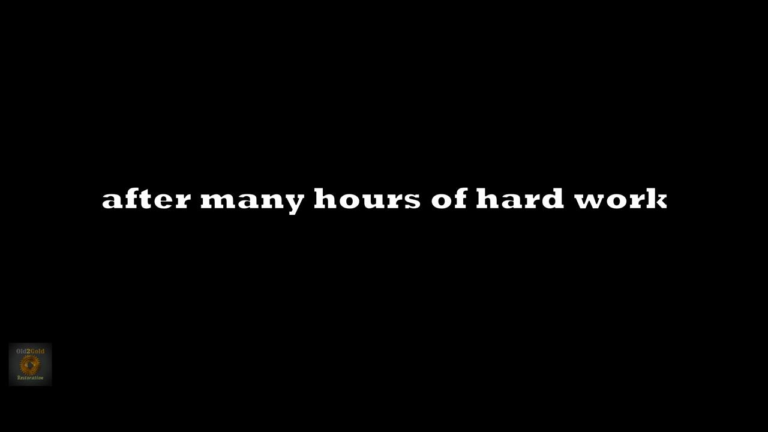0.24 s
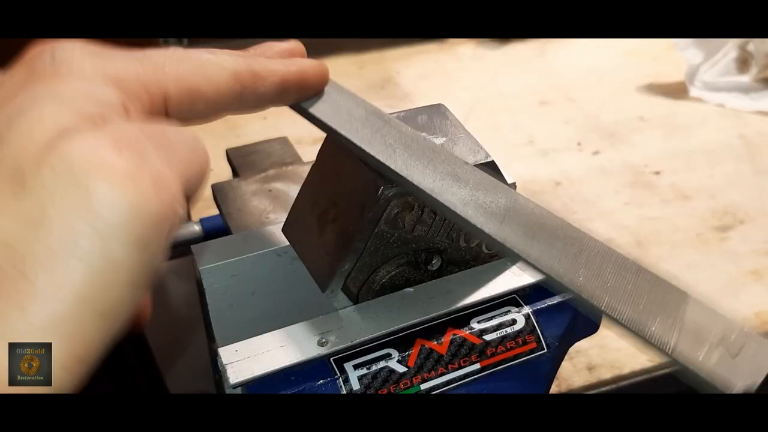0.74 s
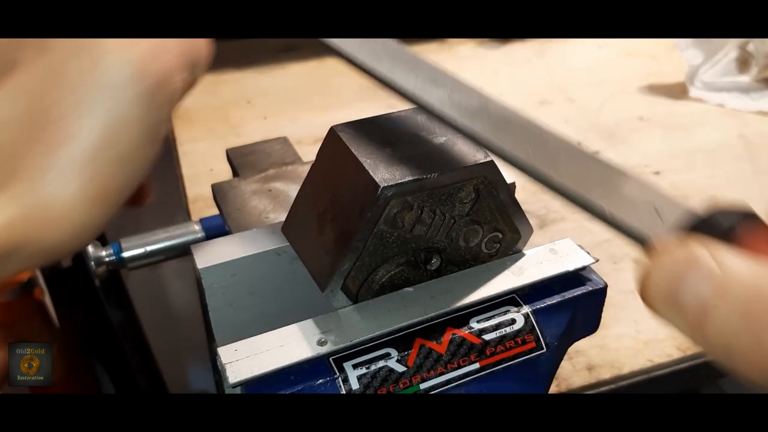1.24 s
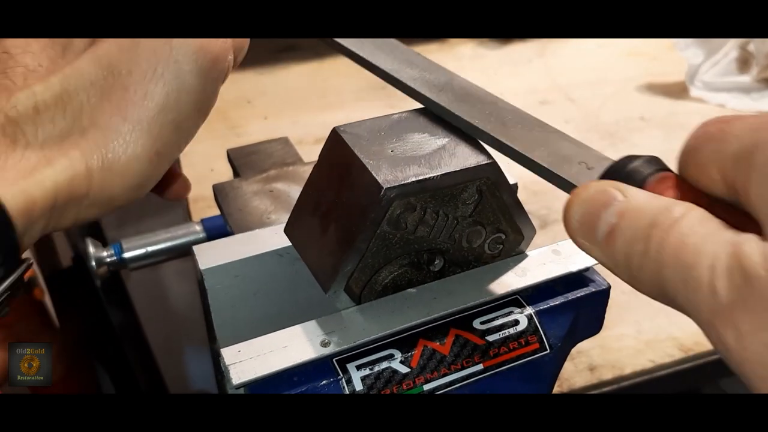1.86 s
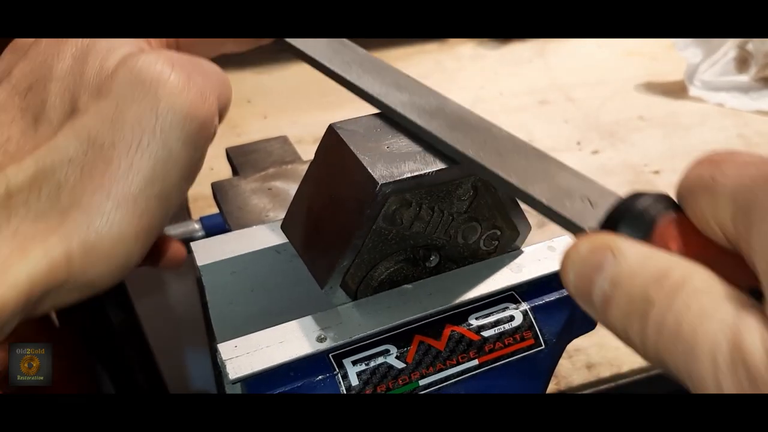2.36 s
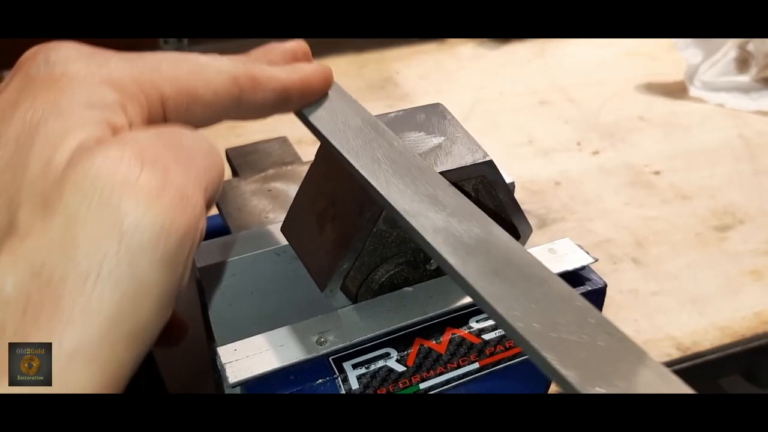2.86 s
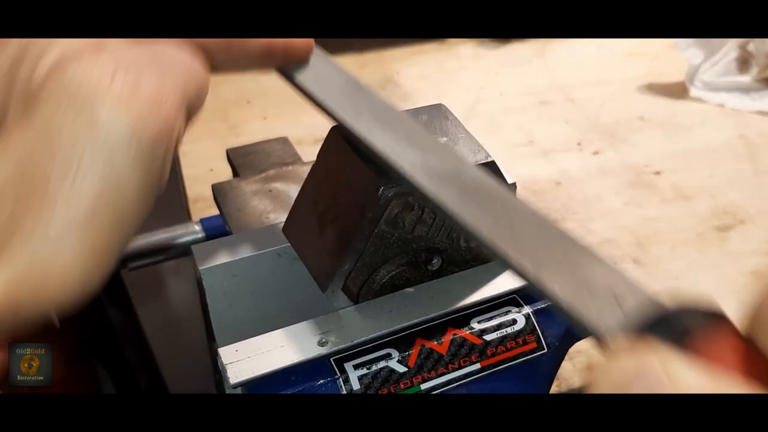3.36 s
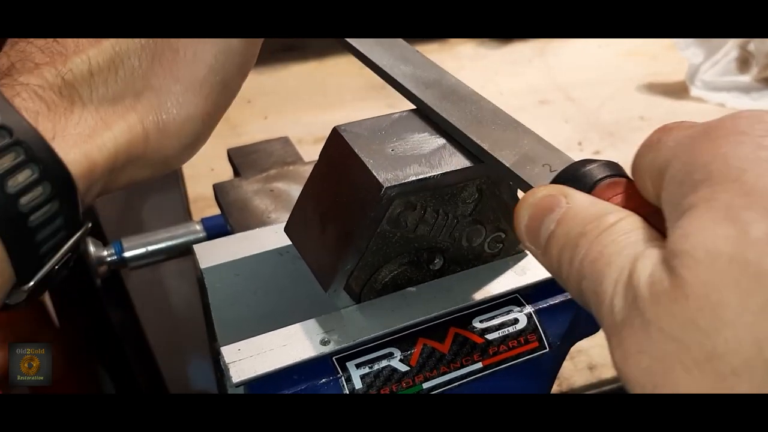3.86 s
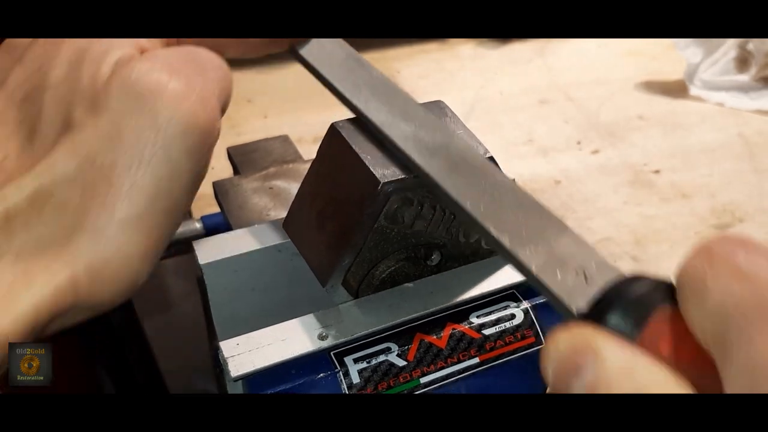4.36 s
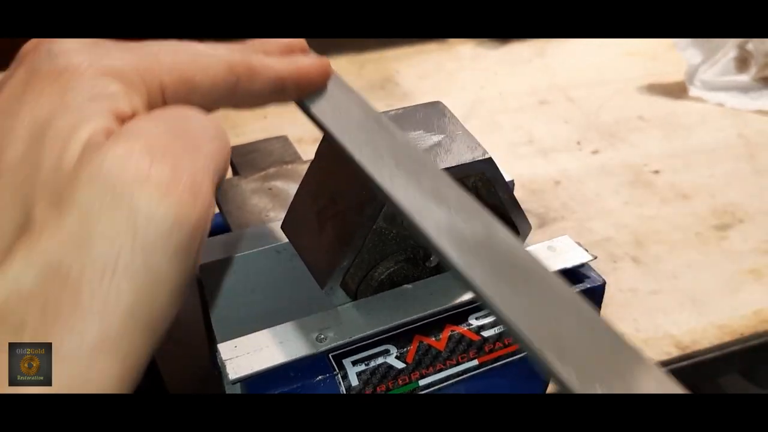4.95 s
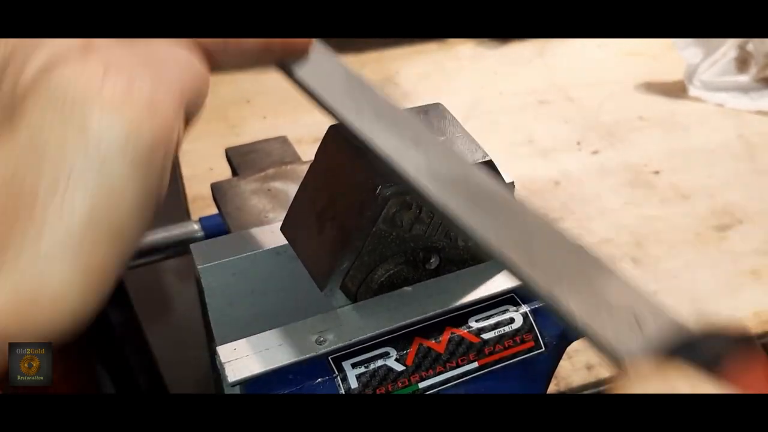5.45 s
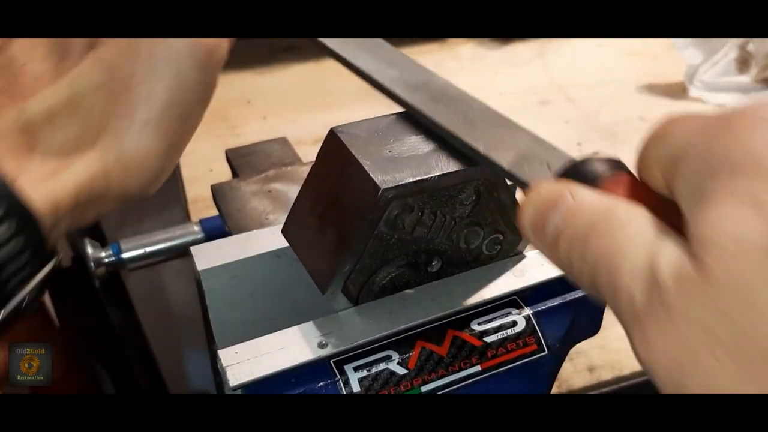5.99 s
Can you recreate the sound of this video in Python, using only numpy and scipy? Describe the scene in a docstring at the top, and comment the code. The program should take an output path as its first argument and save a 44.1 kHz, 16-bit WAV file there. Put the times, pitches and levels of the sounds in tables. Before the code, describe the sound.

A hand file clacks onto a clamped iron block and rasps across it in nine short, gritty pushes, in a small hard-walled workshop.

```python
"""A hand file works an iron block in a vise on a wooden bench, close to a microphone pair set askew.
Nine times it lands with a clack and is pushed: chips torn off by its teeth hiss at the contact, ring
the block and vise and make the bench rumble. Soft rubs fall between pushes; two faint touches end it.
Random chip impulses and landing bursts drive filters and resonances; a small hard-walled workshop
answers with shifting echoes, over a quiet noise floor."""
import sys
import numpy as np
from scipy import signal
from scipy.fft import rfft, irfft
from scipy.io import wavfile

SR = 44100
rng = np.random.default_rng(int(sys.argv[2]) if len(sys.argv) > 2 else 0)


def log_audio(samples):
    """Write samples as a 16-bit WAV file to the path given in sys.argv[1]."""
    # one column per channel
    frames = np.atleast_2d(samples).T
    # limit to full scale, then quantise
    limited = np.clip(frames, -1, 1)
    pcm = np.round(limited * 32767).astype(np.int16)
    wavfile.write(sys.argv[1], SR, pcm)


N = 274302
T = np.arange(N) / SR   # time/s

# All levels in the tables are relative.
# Noise floor of the place: f/Hz, density level/dB
FLOOR_SPECTRUM = [(25, -19.5), (70, -3.5), (150, -4), (220, -6), (450, 2), (1000, -18.5), (1600, -16.5),
                  (3000, -22), (8000, -28.5), (16000, -27.5)]
# Decay of the workshop by 60 dB: f/Hz, t/s
ROOM_DECAY = [(100, 1), (500, 0.66), (1500, 0.38), (4000, 0.41), (7000, 0.21), (12000, 0.32), (16000, .23)]
# Resonances of the bench top: f/Hz, width/Hz, level/dB
BENCH_MODES = [(70.3, 10, 6), (88, 24, -10.5), (115, 22, -3), (144.2, 13, 10), (173, 9.9, -13)]
# Resonances of the vise: f/Hz, width/Hz, level/dB, left minus right level/dB
VISE_MODES = [(263, 46, -10.5, -4), (340, 51, -5, -1), (392, 43, -5, -2), (484, 54, -0.5, -1.5),
              (542, 28.8, 2.5, 0), (587, 160, -10, 2.5)]
# Resonances of the iron block with the file on it: f/Hz, width/Hz, level/dB, left minus right level/dB
BLOCK_MODES = [(1035.5, 53.5, 1.5, -5.5), (1125, 69, -3.5, 6), (1152, 29, 4, 4), (1197, 29, 2.5, -14),
               (1289, 48, -2, 10.5), (1408, 63, 2.5, -1.5), (1508, 140, 3, -3), (1567.7, 9.9, 6, -1.5),
               (1660, 20, -3.5, -1), (1740, 18, -2, 12.5), (1812, 54, -4, 0.5), (1865, 65, -5.5, 1),
               (1938, 86, 0.5, -11), (2045, 150, -3.5, 16.5), (2153, 42, -2, 0.5), (2500, 140, -11.5, 10.5),
               (3394, 39, -9.5, 8.5)]
# Light rubs of the file as it is lifted and brought back: t/s, Gaussian sigma/s,
# hollow swish level/dB, rustle level/dB
RUBS = [(0.66, 0.03, -76.5, -84), (1.341, 0.005, -52.5, -67), (1.391, 0.0037, -41, -65),
        (1.417, 0.014, -43, -48.5), (2.789, 0.017, -49, -68), (4.605, .01, -68, -46),
        (6.152, 0.009, -52, -58), (6.21, 0.025, -42, -53)]
# Colour of the hollow swish: f/Hz, density level/dB
SWISH_SPECTRUM = [(150, -27.5), (450, 0), (620, -10.5), (720, 1.5), (900, -2.5), (1100, -21), (2500, -20),
                  (8000, -51)]
# Landings of the file: t/s, crack level/dB, knock in the block level/dB, treble tilt level/dB,
# ring of the file f/Hz, its level/dB, skid level/dB, judder level/dB
LANDINGS = [(0.0249, 2.5, -2.5, -2.5, 11820, -5.5, -34.5, -38.5),
            (0.7848, 2.5, 1, -8, 4350, -25, -32, -37.5), (1.4568, -2, -10, 2.5, 5270, -2, -37, -39.5),
            (2.1125, -8.5, -3, -8.5, 4380, -13.5, -39.5, -41),
            (2.8161, 0, -0.5, -2, 5380, -9.5, -38.5, -43), (3.4405, -12, -9, -10.5, 6900, -17, -39, -44),
            (4.1247, -11.5, -8, 1, 6860, -34, -45.5, -51.5),
            (4.7974, -23.5, -8.5, -3, 2010, -51, -45, -51.5),
            (5.546, -11, -7, -9.5, 5280, -26.5, -45, -43.5), (6.024, -30, -21, -19, 7300, -49, -60, -69),
            (6.2115, -30, -15, -5, 4460, -44, -57.5, -66)]
# Colour of the crack on landing: f/Hz, density level/dB
CRACK_SPECTRUM = [(200, -18.5), (700, -17), (1300, -11), (2050, -4), (2900, -5.5), (4300, -2), (5300, -3),
                  (6100, -3.5), (7200, -4), (8600, -20.5), (9600, -17), (12000, -5.5), (14400, -19),
                  (15500, -9.5)]
# Pushes of the file: start t/s, speeding up t/s, full speed t/s, slowing t/s (before overrun),
# drag on the block level/dB, bite of the teeth level/dB, hiss of the chips level/dB, bench rumble level/dB
PUSHES = [(0.08, 0.099, 0.063, 0.17, -30, -32.5, -38, -41), (0.84, 0.11, 0.068, 0.18, -30, -39, -41, -38.5),
          (1.52, 0.1, 0.1, .16, -29.5, -35, -39, -40), (2.18, 0.079, 0.098, 0.17, -28.5, -36, -37.5, -36.5),
          (2.87, 0.16, 0.049, 0.13, -27.5, -31, -35, -38), (3.53, 0.16, 0.083, 0.088, -28.5, -32, -36, -37),
          (4.215, .18, 0.061, 0.096, -28, -31.5, -35, -36), (4.92, .16, 0.091, 0.096, -27.5, -33, -35, -38),
          (5.62, 0.13, 0.041, 0.14, -25.5, -27.5, -29.5, -36)]
# Hands ease off or bear down in mid-push: t/s, Gaussian sigma/s, change of pressure level/dB
PRESSES = [(1.044, 0.015, -12.5), (1.101, 0.016, 2), (2.496, 0.011, 5), (4.435, 0.01, 1),
           (5.112, 0.012, -1.5), (5.155, 0.017, 1.5)]
# Colours of the scrape, the bite and the hiss at the contact: f/Hz, density level/dB
SCRAPE_SPECTRUM = [(200, -28.5), (280, -12.5), (500, -10.5), (700, -3), (950, -6), (1500, 3.5),
                   (2050, -5.5), (2400, -16.5), (2800, -1.5), (3700, 4), (4700, -1), (5600, 0), (6800, -2),
                   (8500, -38)]
BITE_SPECTRUM = [(3000, -38.5), (5200, -18.5), (6100, -7), (6900, -1), (7550, -2), (8000, -7.5),
                 (8600, -24), (11000, -30.5)]
HISS_SPECTRUM = [(5000, -26), (8600, -10), (9400, 0.5), (10300, 1), (11700, 1.5), (13300, -0.5),
                 (14400, -6), (14900, -6), (15400, 5), (15750, -3), (16200, -21.5)]

FLOOR_DB = -67.5
LEFT_LAG_S = 0.000443
CUTOFF_HZ = 16000
BITE_FOLLOWS, HISS_FOLLOWS = 5.7, 3.7   # dB for each dB of pressure
# Skid after landing: its bite, hiss and rumble are relative to its drag
SKID_RISE_S, SKID_HOLD_S, SKID_FADE_S = 0.01, 0.042, 0.036
SKID_BITE_DB, SKID_HISS_DB, SKID_RUMBLE_DB = -15.5, -20.5, -4
# Drive of the bench's deepest notes: at the start, growth, ceiling
ROCKING_DB, ROCKING_DB_PER_S, ROCKING_MOST_DB = -0.5, 2.5, 6.5
# Judder close to the bench's main note
JUDDER_HZ, JUDDER_WANDER_HZ = 145.6, 7
JUDDER_RISE_S, JUDDER_HOLD_S, JUDDER_FADE_S = 0.06, 0.025, 0.081


def from_db(db):
    """Amplitude ratio for a level in dB."""
    return 10 ** (np.asarray(db) / 20)


def rms_one(x):
    """Scales a signal to rms 1."""
    return x / np.sqrt(np.mean(x ** 2) + 1e-20)


def at_hz(points, hz):
    """Reads a table on a log-frequency axis."""
    known, values = np.transpose(points)
    return np.interp(np.log(np.maximum(hz, 1)), np.log(known), values)


def pan(db):
    """Left and right gains for a left minus right level, at constant power."""
    return rms_one(from_db(np.array([[db], [-db]]) / 2))


def convolve(x, response):
    """Passes each channel through its response and keeps the length."""
    return signal.oaconvolve(np.atleast_2d(x), np.atleast_2d(response), axes=1)[:, :np.shape(x)[-1]]


def colour(x, spectrum, size=2048):
    """Causal (minimum-phase) filter of a given spectrum; keeps the power of white input."""
    hz = np.fft.rfftfreq(size, 1 / SR)
    cepstrum = irfft(np.log(from_db(at_hz(spectrum, hz))))
    # folding the cepstrum forward in time makes the phase minimal
    cepstrum[1:size // 2] *= 2
    cepstrum[size // 2 + 1:] = 0
    response = irfft(np.exp(rfft(cepstrum)))
    return convolve(x, response / np.linalg.norm(response))[0]


def resonate(x, hz, width):
    """One damped resonance, gain about 1 on top."""
    r = np.exp(-np.pi * width / SR)
    numerator = np.array([1, 0, -1]) * (1 - r * r) / 2
    denominator = [1, -2 * r * np.cos(2 * np.pi * hz / SR), r * r]
    return signal.lfilter(numerator, denominator, x + 1e-18)


def modes_rms(modes):
    """Approximate rms of a set of resonances driven by white noise of rms 1."""
    return np.sqrt(sum(np.pi * width / SR * from_db(db) ** 2 for hz, width, db, *_ in modes))


def drift(per_s):
    """Random wander of rms 1, in straight lines between per_s new values a second."""
    return rms_one(np.interp(T * per_s, np.arange(8192), rng.standard_normal(8192)))


def bump(s, sigma):
    """Gaussian swell of height 1 around a moment."""
    return np.exp(-np.minimum(((T - s) / sigma) ** 2 / 2, 20))


def after_landing(s, rise_s, hold_s, fade_s):
    """Attack, hold and exponential release, starting at a landing."""
    attack = np.clip((T - s) / rise_s, 0, 1)
    return attack * np.exp(-np.clip((T - s - rise_s - hold_s) / fade_s, 0, 20))


def chips(per_s, spread_db):
    """Tiny impulses of uneven size, one for each chip that a tooth tears off; rms 1."""
    sizes = from_db(spread_db * np.minimum(rng.exponential(1, N), 5))
    signs = rng.choice([-1, 1], N)
    return rms_one(sizes * signs * (rng.random(N) < per_s / SR))


def noise_floor():
    """Quiet background: independent coloured noise on the two sides."""
    sides = rng.standard_normal((2, N))
    return from_db(FLOOR_DB) * np.array([colour(side, FLOOR_SPECTRUM) for side in sides])


def workshop(first_echo_s, early_db, early_s, size=24000):
    """Stereo echoes of unit energy: strong ones from the bench top, then a tail decaying band by band."""
    t, hz = T[:size], np.fft.rfftfreq(size, 1 / SR)
    white = rfft(rng.standard_normal((2, size)))
    onset = np.clip(t / first_echo_s - 1, 0, 1)
    early = 1 + from_db(early_db) * np.exp(-t / early_s)
    edges = np.r_[0, np.geomspace(250, 16000, 13), SR]
    out = 0
    for low, high in zip(edges, edges[1:]):
        inside = (hz >= low) & (hz < high)
        tail = from_db(-60 * t / at_hz(ROOM_DECAY, low))
        band = irfft(white * inside, size) * tail * early * onset
        out = out + band * np.sqrt(inside.mean() / np.sum(band ** 2, axis=1, keepdims=True))
    return out


def echoes(feed, shifts_per_s, count=4):
    """File and hands move, so the sound keeps shifting between different paths through the room."""
    weights = np.array([drift(shifts_per_s) for path in range(count)])
    weights /= np.linalg.norm(weights, axis=0)
    out = 0
    for weight in weights:
        path = workshop(first_echo_s=0.0011, early_db=3.5, early_s=0.018)
        out = out + convolve(feed * weight, path)
    return out


def left_late(x):
    """The microphone pair sits askew: direct sound reaches the left side a little later."""
    left, right = np.broadcast_to(x, (2, N))
    return np.array([np.interp(T - LEFT_LAG_S, T, left), right])


def heard(x, direct_db, direct_pan_db, room_pan_db):
    """Splits a source into direct sound and room feed, at direct_db direct to room; total power is kept."""
    gain = from_db(direct_db)
    direct = gain * left_late(x) * pan(direct_pan_db)
    feed = x * pan(room_pan_db)
    return np.array([direct, feed]) / np.hypot(gain, 1)


def bench(force, low_hz, high_hz):
    """The bench top booms under the vise: wood resonances in a narrow range of the bass."""
    rocked = force * from_db(np.minimum(ROCKING_DB + ROCKING_DB_PER_S * T, ROCKING_MOST_DB))
    boom = 0
    for hz, width, db in BENCH_MODES:
        drive = rocked if hz < 100 else force
        boom = boom + from_db(db) * resonate(drive, hz, width)
    band = signal.butter(2, [low_hz, high_hz], "band", fs=SR, output="sos")
    return signal.sosfilt(band, boom / modes_rms(BENCH_MODES))


def judder():
    """After a landing the file catches and slips with the bench: a hum unsteady in pitch and level."""
    level = sum(from_db(db) * after_landing(s, JUDDER_RISE_S, JUDDER_HOLD_S, JUDDER_FADE_S)
                for s, *_, db in LANDINGS)
    hz = JUDDER_HZ + JUDDER_WANDER_HZ * drift(30)
    hum = rms_one(np.sin(2 * np.pi * np.cumsum(hz) / SR))
    return level * from_db(2 * drift(25)) * hum


def ring(force, modes):
    """Clamped metal rings; neighbouring modes swing in opposite senses, each with a direction of its own."""
    out = np.zeros((2, N))
    for k, (hz, width, db, side) in enumerate(modes):
        out += (-1) ** k * from_db(db) * pan(side) * resonate(force, hz, width)
    return out / modes_rms(modes)


def rubs():
    """Soft swishes and rustles of the file between pushes: swells of coloured chip noise."""
    swish, rustle = np.zeros(N), np.zeros(N)
    for s, sigma, swish_db, rustle_db in RUBS:
        touch = bump(s, sigma)
        swish += from_db(swish_db) * touch
        rustle += from_db(rustle_db) * touch
    grit = chips(per_s=6200, spread_db=12)
    return swish * colour(grit, SWISH_SPECTRUM) + rustle * colour(grit, SCRAPE_SPECTRUM)


def clacks(contact_s, ring_width_hz, ring_db, chatter_db, chatter_s, size=4096):
    """The file lands: hard crack, hand-damped ring, short chatter. Returns the sound and the block's blow."""
    sound, blow, t = np.zeros(N + size), np.zeros(N + size), T[:size]
    contact = np.exp(-t / contact_s)
    chatter = from_db(chatter_db) * np.exp(-t / chatter_s)
    damping = np.exp(-np.pi * ring_width_hz * t) * (1 - contact)
    for s, db, knock_db, bright_db, hz, file_db, *_ in LANDINGS:
        at = round(s * SR)
        force = rng.standard_normal(size) * (contact + chatter)
        force[0] += 4   # the first tooth to touch
        force /= np.linalg.norm(force)
        # the tilt grows from 5 kHz to 10 kHz, then stays
        tilted = [(f, level + bright_db * np.clip(np.log2(f / 5000), 0, 1)) for f, level in CRACK_SPECTRUM]
        file_ring = np.sin(2 * np.pi * hz * t) * damping
        sound[at:at + size] += from_db(db) * colour(force, tilted)
        sound[at:at + size] += from_db(file_db + ring_db) * file_ring
        blow[at:at + size] += from_db(knock_db) * force
    return sound[:N], blow[:N]


def pushes(levels_db, rise_power, fall_power, overrun_s):
    """Gain of one part of the sound: it grows as a power of the file's speed, holds, and dies as it slows."""
    gain = np.zeros(N)
    for (start, rise, hold, fall, *_), db in zip(PUSHES, levels_db):
        speeding = np.clip((T - start) / rise, 0, 1)
        slowing = np.clip(1 - (T - start - rise - hold) / (fall + overrun_s), 0, 1)
        gain += from_db(db) * speeding ** rise_power * slowing ** fall_power
    return gain


def pressure():
    """Gain from the brief changes in how hard the hands bear down."""
    return from_db(sum(db * bump(s, sigma) for s, sigma, db in PRESSES))


def filing():
    """Levels in dB of the drag, bite, hiss and rumble: a skid after each landing, joined by the push."""
    drag_db, bite_db, hiss_db, rumble_db = np.transpose(PUSHES)[4:]
    skid = sum(from_db(db) * after_landing(s, SKID_RISE_S, SKID_HOLD_S, SKID_FADE_S)
               for s, *_, db, judder_db in LANDINGS)
    press = pressure()
    drag = press * pushes(drag_db, rise_power=0.5, fall_power=1.6, overrun_s=0.031)
    bite = press ** BITE_FOLLOWS * pushes(bite_db, rise_power=1.32, fall_power=3.45, overrun_s=0.0059)
    hiss = press ** HISS_FOLLOWS * pushes(hiss_db, rise_power=0.99, fall_power=3.4, overrun_s=0.005)
    rumble = pushes(rumble_db, rise_power=0.55, fall_power=0.73, overrun_s=0.089)
    # push and skid add in power
    gains = np.array([np.hypot(drag, skid),
                      np.hypot(bite, from_db(SKID_BITE_DB) * skid),
                      np.hypot(hiss, from_db(SKID_HISS_DB) * skid),
                      np.hypot(rumble, from_db(SKID_RUMBLE_DB) * skid)])
    return 20 * np.log10(gains + 1e-6)


def along_file(force, drag_db, near_s, growth_s, echo):
    """Chips echo from the file's tip, ever later as the contact moves away: a comb of peaks sweeps down."""
    pushing = drag_db > -50
    pushed_s = T - np.maximum.accumulate(np.where(pushing, 0, T))
    delay_s = near_s + growth_s * pushed_s
    return rms_one(force + echo * np.interp(T - delay_s, T, force))


def cutting(drag_db):
    """Rows of teeth catch and let go, shaking coarse chips (to the metal) and fine ones (to the air) alike."""
    catch = rms_one(from_db(1.46 * drift(420) + 1.2 * drift(90)))
    coarse = catch * chips(per_s=5000, spread_db=3.5)
    fine = catch * chips(per_s=9000, spread_db=2.0)
    return coarse, along_file(fine, drag_db, near_s=0.0002, growth_s=0.0012, echo=0.5)


def contact(fine, drag_db, bite_db, hiss_db):
    """Fine chips sound at the contact as scrape, bite and hiss, each with its own colour and level."""
    # the scrape grows with both drag and bite
    scrape_db = 0.58 * drag_db + 0.42 * bite_db + 0.23 + 2 * drift(70)
    scrape = from_db(scrape_db) * colour(fine, SCRAPE_SPECTRUM)
    bite = from_db(bite_db + 1.2 + 1.4 * drift(110)) * colour(fine, BITE_SPECTRUM)
    hiss = from_db(hiss_db - 0.13) * colour(fine, HISS_SPECTRUM)
    return scrape, bite, hiss


def scene():
    """Chips and clacks drive the contact, the metal and the bench; the room answers."""
    drag_db, bite_db, hiss_db, rumble_db = filing()
    coarse, fine = cutting(drag_db)
    scrape, bite, hiss = contact(fine, drag_db, bite_db, hiss_db)
    crack, blow = clacks(contact_s=0.00045, ring_width_hz=850, ring_db=1, chatter_db=-29.5, chatter_s=0.00668)
    block = ring(from_db(drag_db + 2.68) * coarse + from_db(5.0) * blow, BLOCK_MODES)
    vise_drive = from_db(drag_db - 16) + from_db(rumble_db - 3.5)
    vise = ring(vise_drive * coarse + from_db(-1.0) * blow, VISE_MODES)
    bench_force = from_db(rumble_db - 3.5) * chips(per_s=2500, spread_db=1.0) + from_db(-20) * blow
    boom = bench(bench_force, low_hz=69, high_hz=177) + judder()
    direct, feed = (heard(rubs(), direct_db=-3.0, direct_pan_db=-14, room_pan_db=6.5)
                    + heard(from_db(8) * crack, direct_db=4.0, direct_pan_db=-15.5, room_pan_db=1)
                    + heard(block, direct_db=-3.0, direct_pan_db=2.5, room_pan_db=2.0)
                    + heard(scrape, direct_db=-1, direct_pan_db=-10, room_pan_db=-1.5)
                    + heard(bite, direct_db=-6, direct_pan_db=-22.5, room_pan_db=-6.5)
                    + heard(hiss, direct_db=2.0, direct_pan_db=-19, room_pan_db=-4))
    # bench and vise reach the pair without the left lag, the bench almost alike on both sides
    near = boom * pan(-0.6) + from_db(-1.36) * vise
    feed = feed + from_db(-24.0) * boom + from_db(-9) * vise
    return direct + near + echoes(feed, shifts_per_s=35) + noise_floor()


def record(dry):
    """Peaks are clipped at full scale, then a steep low-pass cuts the top."""
    low_pass = signal.ellip(10, 0.1, 80, CUTOFF_HZ, fs=SR, output="sos")   # ripple/dB, stop band/dB
    return signal.sosfilt(low_pass, np.clip(dry, -1, 1))


dry = scene()
out = record(dry)
log_audio(out)
```